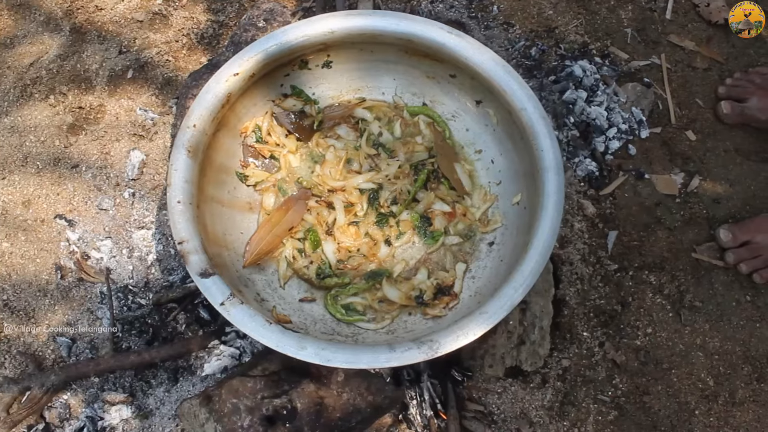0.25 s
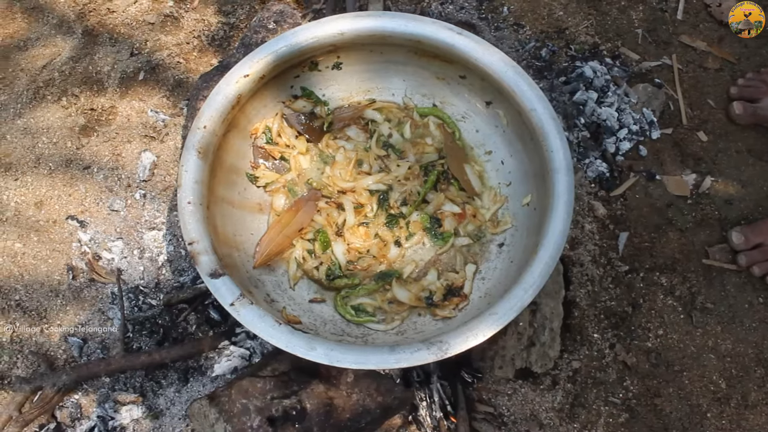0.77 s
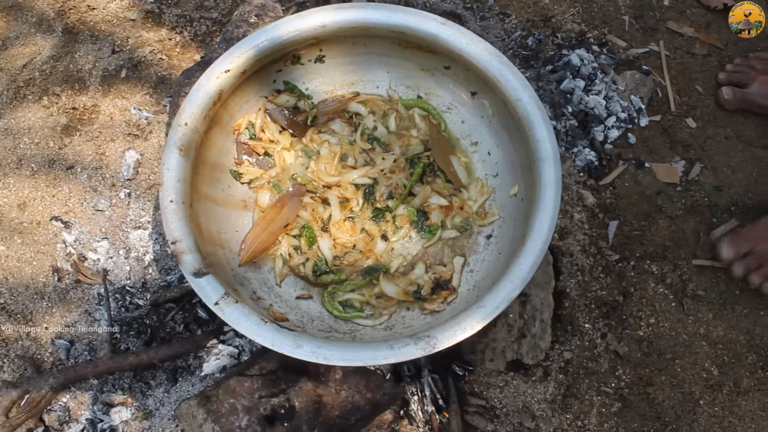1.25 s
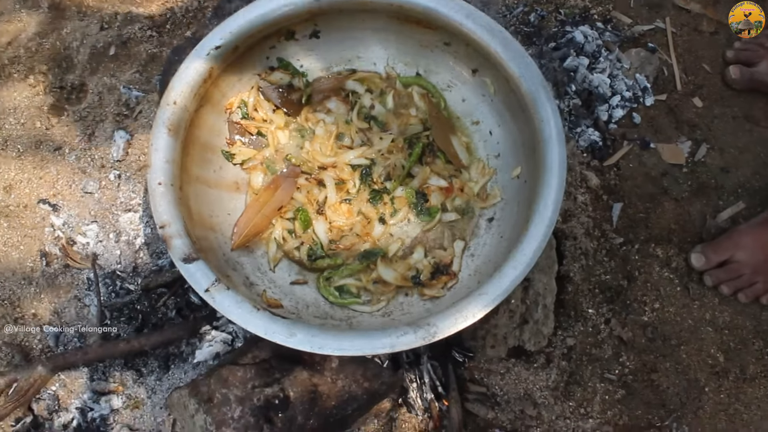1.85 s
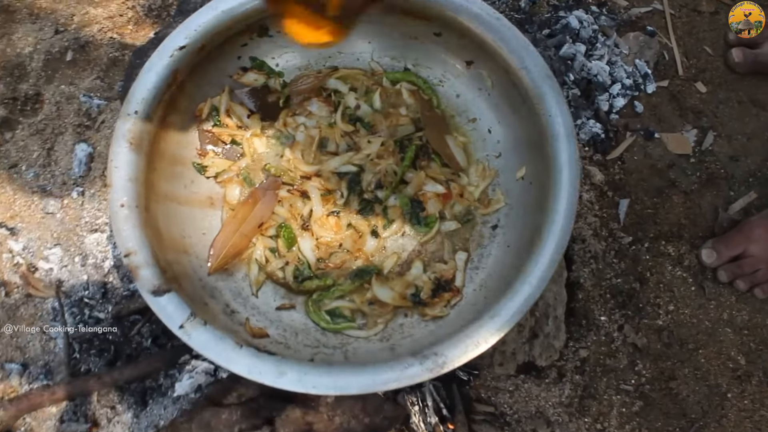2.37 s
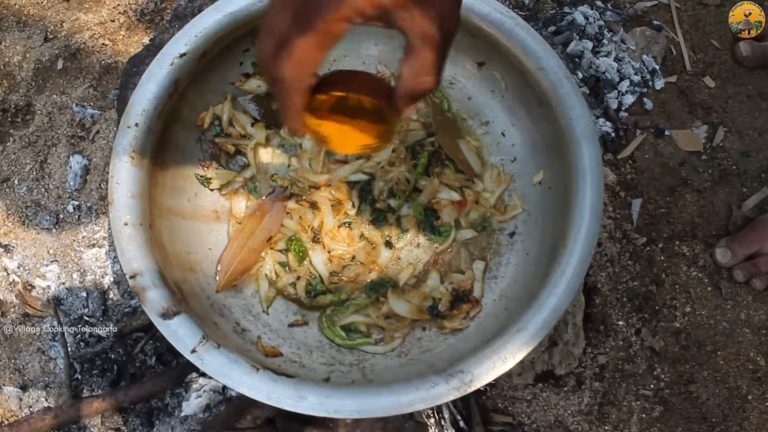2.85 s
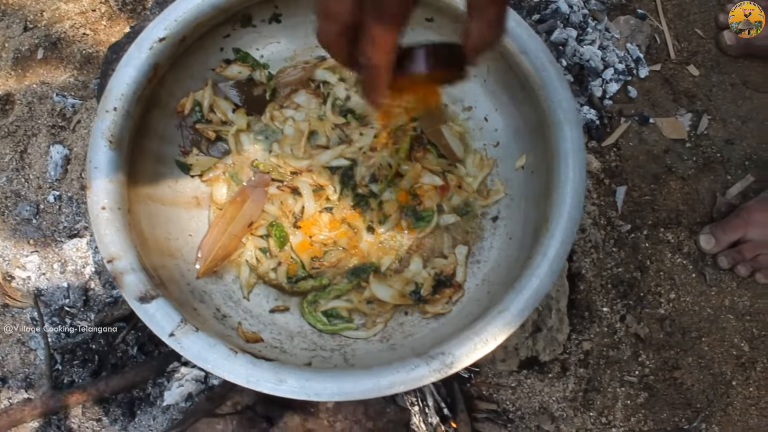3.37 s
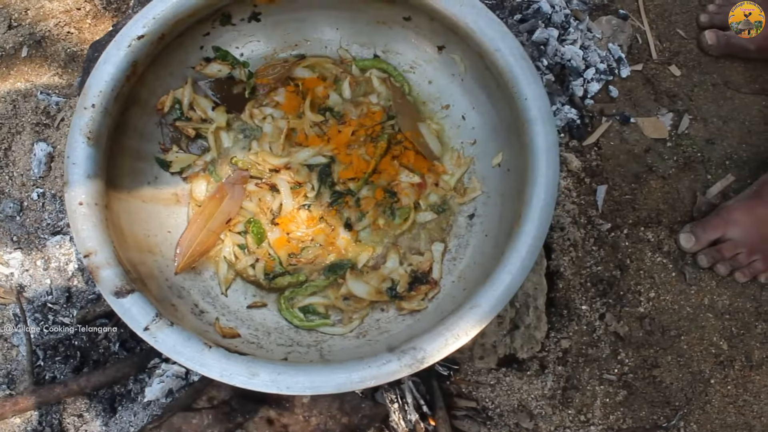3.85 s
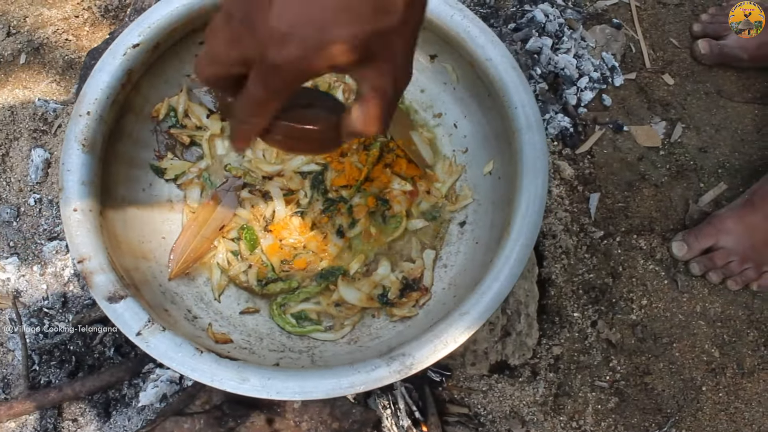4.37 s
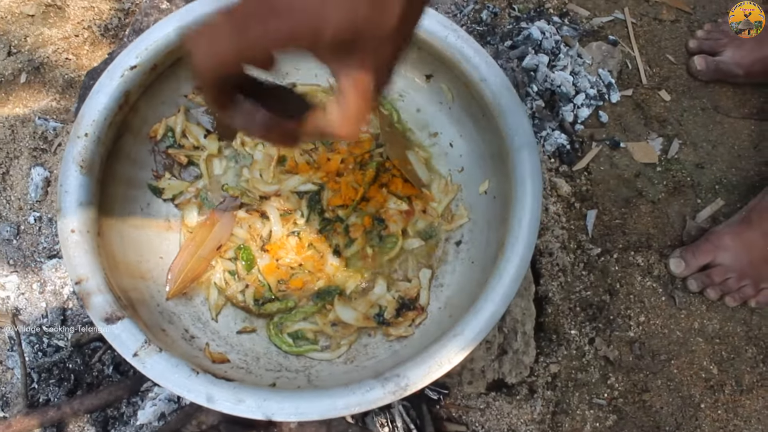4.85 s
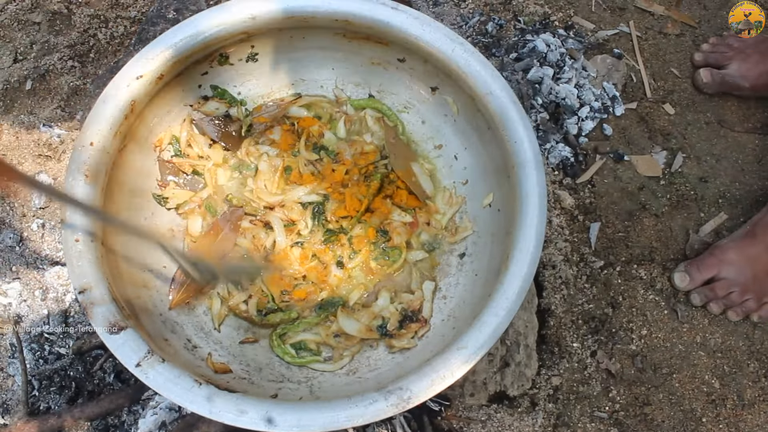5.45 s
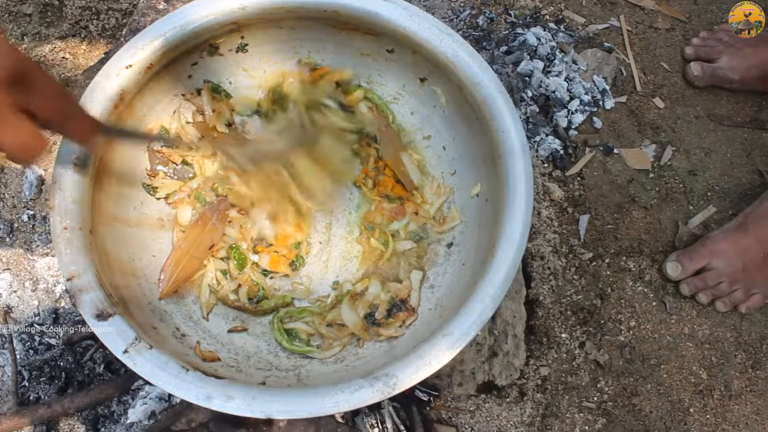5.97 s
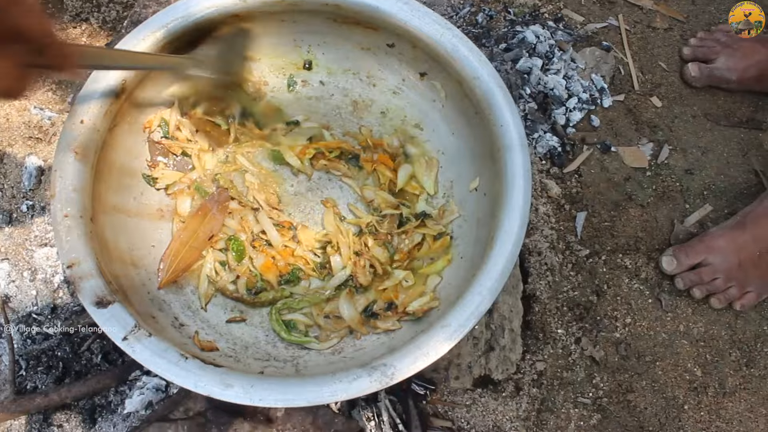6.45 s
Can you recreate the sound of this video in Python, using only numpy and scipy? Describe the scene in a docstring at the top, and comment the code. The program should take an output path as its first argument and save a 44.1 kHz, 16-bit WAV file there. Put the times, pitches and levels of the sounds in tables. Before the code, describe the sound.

Onions frying with a dense crackling hiss and snapping water drops, broken by a ringing ladle knock, soft pot thumps and brief faint scrapes.

```python
"""Onions fry in a wide metal pot outdoors. From the start, clumped bubble resonances over noise make the sizzle,
filtered noise makes the pot's murmur and light wind, and struck resonators make spitting pops of water drops.
Then come dull thumps of the pot bottom (driven resonance), ladle knocks and ladle scrapes (modal ringing).
A limiter ducks everything at each loud peak and lets it swell back.
The same passage is played again from its start after one round."""
import sys
import numpy as np
from scipy import signal
from scipy.fft import rfft, irfft, next_fast_len
from scipy.io import wavfile
from scipy.ndimage import uniform_filter1d, minimum_filter1d

SR = 44100
rng = np.random.default_rng(int(sys.argv[2]) if len(sys.argv) > 2 else 0)


def dump_mix(stems):
    """Bounce the given channels to the path in sys.argv[1] as a 16-bit WAV at rate SR."""
    frames = np.atleast_2d(stems).T  # one column per channel
    limited = np.clip(frames, -1, 1)  # hard clip at full scale
    pcm = np.round(limited * 32767).astype(np.int16)
    wavfile.write(sys.argv[1], SR, pcm)


N = 295470
ROUND_S = 4.48
ROUND_N = round(ROUND_S * SR)   # samples in one round

# modal frequencies of pot and ladle: one column (frequency [Hz])
MODE_HZ = [335, 432, 560, 1000, 1290, 1627, 2060, 2230, 2678, 3110, 3511, 4600, 4949, 6400, 8200, 10300]
# decay and excitation of each mode, in the same order:
# (t60 [s], level at contact place 0 [dB], at place 1 [dB], at place 2 [dB], at place 3 [dB])
MODE_RESPONSE = [(0.115, -26, -16.5, -14, -22), (0.051, -8, -11, -33, -24), (0.032, -6, 12.5, 0.5, -1),
                 (0.13, -29.5, -7, -12, -35), (0.057, -50, 5.5, -9, -14), (0.27, -17, -26, -24, -10),
                 (0.07, -14.5, -24, -24, -9), (0.071, -55, 1, -28, -1), (0.13, -7.5, 0, -31, 2),
                 (0.075, -36.5, -25, 3.5, 0), (0.085, 0.5, -22, -28, 2), (0.015, 0, -10, 4, -20),
                 (0.096, -16, -5, -15, -3), (0.038, -6, -1, 1, -24), (0.0055, -6, 7, 8, -23),
                 (0.036, -28.5, 3, -23, -24)]


def from_db(db):
    """Level to amplitude: 20 dB is a factor of ten."""
    return 10 ** (np.asarray(db) / 20)


def rms_one(x):
    """Normalisation to unit root-mean-square amplitude."""
    return x / np.sqrt(np.mean(x ** 2) + 1e-20)


def filtered(x, order, hz, kind):
    """Butterworth filtering: a maximally flat pass band."""
    return signal.sosfilt(signal.butter(order, hz, kind, fs=SR, output="sos"), x)


def in_time(rows):
    """Linear interpolation of each column over one round."""
    s, *columns = np.transpose(rows)
    return [np.interp(np.arange(ROUND_N) / SR, s, column) for column in columns]


def shaped(x, spectrum):
    """Minimum-phase colouring by (frequency [Hz], gain [dB]) points keeps clicks sharp; rms 1."""
    size = next_fast_len(len(x))
    hz, db = np.transpose(spectrum)
    grid = np.maximum(np.arange(size // 2 + 1) * SR / size, 1)
    log_gain = np.interp(np.log(grid), np.log(hz), db) * np.log(10) / 20
    # folding the cepstrum onto positive times gives minimum phase
    cepstrum = irfft(log_gain, size)
    cepstrum[1:size // 2] *= 2
    cepstrum[size // 2 + 1:] = 0
    response = np.exp(rfft(cepstrum))
    return rms_one(irfft(rfft(x, size) * response, size)[:len(x)])


def drift(rate_hz):
    """Slow random fluctuation of rms 1: white noise through a two-pole low-pass."""
    r = np.exp(-2 * np.pi * rate_hz / SR)
    noise = rng.standard_normal(ROUND_N + SR)
    # the first second is left out so that the filter has settled
    return rms_one(signal.lfilter([1], [1, -2 * r, r * r], noise)[SR:])


def ring(clicks, hz, t60):
    """Damped resonance: a unit click sets a decaying sine of initial height 1 ringing."""
    r = from_db(-60 / (t60 * SR))
    w = 2 * np.pi * min(hz, 18000) / SR
    return signal.lfilter([0, np.sin(w)], [1, -2 * r * np.cos(w), r * r], clicks + 1e-18)


def struck(force, place, ring_share=1):
    """Modal superposition: every mode rings as strongly as this contact place excites it."""
    return sum(from_db(levels[place]) * ring(force, hz, ring_share * t60)
               for hz, (t60, *levels) in zip(MODE_HZ, MODE_RESPONSE))


def add(out, s, sound):
    """Linear superposition of a sound that starts at s seconds."""
    at = round(s * SR)
    out[at:at + len(sound)] += sound[:max(len(out) - at, 0)]


def echoed(x):
    """Early reflection: direct sound plus delayed, weaker copies."""
    # reflections from pot wall and ground: (delay [s], level [dB])
    reflections = [(.0013, -30), (.0035, -23)]
    out = x.copy()
    for delay_s, db in reflections:
        add(out, delay_s, from_db(db) * x)
    return out


def sizzle(per_s, spread_db, cycles, clump_db, hiss_db):
    """Bubble resonance: steam bubbles burst in clumps, each swelling and fading, above a hiss of smaller ones."""
    # colour of the frying: (frequency [Hz], gain [dB])
    frying_colour = [(530, -49), (900, -23), (1120, -29), (1370, -13.5), (1820, -5), (2450, -6),
                     (3180, 1.5), (3710, 1), (5980, -1), (7770, 1.5), (15500, -7.5)]
    sizes = from_db(spread_db * np.minimum(rng.exponential(1, ROUND_N), 5.))
    bursts = sizes * rng.choice([-1, 1], ROUND_N)
    born = rng.random(ROUND_N) < per_s * from_db(clump_db * drift(25.)) / SR
    dealt = rng.integers(0, 16, ROUND_N)   # which pitch each bubble gets
    grains = 0
    for k, hz in enumerate(np.geomspace(900, 14000, 16)):
        once = ring(bursts * born * (dealt == k), hz, cycles / hz)
        twice = ring(once, hz, cycles / hz)   # a second resonance makes the grain swell before it fades
        grains = grains + rms_one(twice) * np.sqrt(hz)
    hiss = rng.standard_normal(ROUND_N) * from_db(1.4 * drift(1.54))
    hiss = rms_one(signal.lfilter([1, -.35], [1], hiss))   # the smallest bubbles are the brightest
    return shaped(rms_one(grains) + from_db(hiss_db) * hiss, frying_colour)


def murmur(sizzle_db):
    """Filtered noise: the pot's murmur follows part of the sizzle's swing in level."""
    # colour of the murmur: (frequency [Hz], gain [dB])
    murmur_colour = [(120, -31.5), (200, -21), (300, -12), (369, 3), (441, 3.5), (494, 5.5), (615, -2),
                     (741, -3), (849, -8), (1110, 2.5), (2400, -6.5), (3120, -29), (5280, -120)]
    mean_db, follow_share = -62.5, 0.58   # level at mean vigour; share of the sizzle's swing
    level_db = mean_db + follow_share * (sizzle_db - sizzle_db.mean())
    noise = shaped(rng.standard_normal(ROUND_N), murmur_colour)
    return from_db(level_db + 2.0 * drift(10.0)) * noise


def wind(wind_db):
    """Turbulence as low-pass-coloured noise of slowly fluctuating level."""
    # colour of the wind: (frequency [Hz], gain [dB])
    wind_colour = [(12, -17), (20, -17), (43, -16.5), (300, -22.5), (390, -30), (660, -120)]
    noise = shaped(rng.standard_normal(ROUND_N), wind_colour)
    return from_db(wind_db + 2.4 * drift(2.4)) * noise


def pops(rows):
    """Impulse response: each burst is a pitched ragged crack, a bright snap and a low body from the pot."""
    out, t = np.zeros(ROUND_N), (np.arange(900) - 60) / SR
    noise = rng.standard_normal((len(rows), 2, 900))
    for (s, hz, peak_db, body_db, snap_db), (ragged, spray) in zip(rows, noise):
        click = (t == 0) + .13 * ragged * np.exp(-np.abs(t) / .0004)
        # the oil settles for a few ms
        splash = click + 0.34 * spray * np.exp(-t / 0.0032) * (t > 0)
        body = filtered(splash, 1, [500, 1900], "band") + 0.024 * ring(click, 516, 0.047)
        crack = filtered(np.gradient(ring(click, hz, 3.2 / hz)), 1, 8000, "low")
        snap_force = np.sign(spray) * (t == 0) + 1.05 * spray * np.exp(-np.abs(t) / 0.00034)
        snap = filtered(snap_force, 2, 7000, "high")
        parts = zip((crack, body, snap), (0, body_db, snap_db))
        burst = sum(from_db(db) * part / np.abs(part).max() for part, db in parts)
        add(out, max(s + t[0], 0), from_db(peak_db) * burst / np.abs(burst).max())
    # so small a source radiates no bass
    return filtered(echoed(out), 3, 330, "high")


def spits():
    """Random arrivals: rows of smaller drops with uniformly spread times, pitches and levels."""
    per_s, (low_hz, high_hz) = 30, (3730, 6000)
    loudest_db, range_db = -32.5, 11   # the peaks spread over this range below the loudest
    body_db, snap_db, vary_db = -24, 0.5, 10.5   # beside the crack; either way by vary_db
    u = rng.random((round(per_s * ROUND_S), 5))
    return np.c_[u[:, 0] * ROUND_S,
                 low_hz + (high_hz - low_hz) * u[:, 1],
                 loudest_db - range_db * u[:, 2],
                 body_db + vary_db * (2 * u[:, 3] - 1),
                 snap_db + vary_db * (2 * u[:, 4] - 1)]


def thumps():
    """Driven resonance: a padded blow pushes the food-damped bottom for a few cycles, then it dies quickly."""
    # soft blows on the pot bottom: (time [s], peak level [dB], pitch [Hz], push length [s])
    soft_blows = [(1.018, -32.5, 430, 0.0052), (1.056, -38, 420, 0.011), (1.258, -51, 400, 0.0095),
                  (1.575, -31, 333, 0.0035), (2.385, -34, 405, 0.0065), (3.117, -40.5, 434, 0.0063),
                  (3.144, -45, 432, 0.018), (4.284, -36.5, 346, 0.006), (4.387, -44.5, 540, .005)]
    out, t = np.zeros(ROUND_N), np.arange(3000) / SR
    for s, peak_db, hz, push_s in soft_blows:
        push = np.sin(2 * np.pi * hz * t) * (t < push_s)
        sound = ring(push, hz, 0.018)
        add(out, s, from_db(peak_db) * sound / np.abs(sound).max())
    return out


def knocks():
    """Modal impact: each mode is caught at its own instant of the contact, which clatters for a few ms."""
    # ladle on pot: (time [s], ring level [dB], clatter level [dB], contact place [0-3])
    ladle_blows = [(1.8464, -14.5, -9.5, 0), (3.958, -48, -42, 2), (3.972, -52, -48, 2),
                   (4.284, -37.5, -33.5, 3)]
    # the modes are caught within contact_s, while the clatter holds; then it fades
    contact_s, fade_s = 0.001195, 0.0048
    out, clatter, t = np.zeros(ROUND_N), np.zeros(ROUND_N), np.arange(SR // 2) / SR
    lags = rng.random((len(ladle_blows), len(MODE_RESPONSE)))
    noises = rng.choice([-1., 1.], (len(ladle_blows), len(t)))
    for (s, ring_db, clatter_db, place), lag, noise in zip(ladle_blows, lags, noises):
        for hz, (t60, *levels), late in zip(MODE_HZ, MODE_RESPONSE, lag):
            mode = ring(1. * (t == 0), hz, t60)
            add(out, s + contact_s * late, from_db(ring_db + levels[round(place)]) * mode)
        fade = np.exp(-np.maximum(t - contact_s, 0) / fade_s)
        add(clatter, s, from_db(clatter_db) * noise * fade)
    return out + filtered(clatter, 1, [1500, 9000], "band")


def scrapes():
    """Friction as dense uneven impulses: catches under each stroke excite the modes and rasp directly."""
    # ladle dragged over the bottom, at contact places 1, 2 and 3 in turn: (start [s], end [s],
    # ring level at start [dB], at middle [dB], at end [dB], rasp beside the ring [dB])
    strokes = [(3.118, 3.164, -41, -47, -55, -2), (3.951, 4.074, -50, -51, -53.5, 1.5),
               (4.283, 4.351, -50, -36, -37.5, 0)]
    # band of each rasp: (low edge [Hz], high edge [Hz])
    rasp_bands = [(1000, 12000), (1210, 15000), (910, 12000)]
    pressed = .55   # share of the ring time left while the ladle presses on the pot
    t, out = np.arange(ROUND_N) / SR, 0
    caught = rng.random(ROUND_N) < 1500 / SR   # 1500 catches per second on average
    catches = rms_one(caught * rng.standard_normal(ROUND_N) * from_db(3.9 * drift(64.0)))
    for place, (row, band_hz) in enumerate(zip(strokes, rasp_bands), 1):
        start, end, *press_db, rasp_db = row
        edges = np.clip((t - start) / 0.002, 0, 1) * np.clip((end - t) / 0.011, 0, 1)
        press = from_db(np.interp(t, [start, (start + end) / 2, end], press_db))
        stroke = edges * press * catches
        # dividing by the response to steady catches sets ring and rasp to their levels
        ringing = struck(stroke, place, pressed) / np.std(struck(catches, place, pressed))
        rasp = filtered(stroke, 1, band_hz, "band") / np.std(filtered(catches, 1, band_hz, "band"))
        out = out + ringing + from_db(rasp_db) * rasp
    return out


def limited(x):
    """Peak limiting: gain drops just ahead of each peak over the ceiling, then climbs back at a steady dB rate."""
    ceiling_db, release_db_per_s, look_ahead_s = -19.5, 18.5, .0015
    climb_db = release_db_per_s * np.arange(len(x)) / SR
    ahead = round(look_ahead_s * SR)
    room_db = np.minimum(ceiling_db - 20 * np.log10(np.abs(x) + 1e-9), 0)
    room_db[0] = -7   # it starts already turned down
    gain_db = np.minimum(np.minimum.accumulate(room_db - climb_db) + climb_db, 0)
    early_db = minimum_filter1d(gain_db, 2 * ahead + 1)
    return x * from_db(uniform_filter1d(early_db, ahead))


def scene():
    """Superposition of all sources over one round, which then repeats."""
    # how hard the oil fries and the wind blows, before the limiter: (time [s], sizzle level [dB], wind level [dB])
    vigour = [(0, -43.5, -68), (.3, -46.5, -68.5), (.45, -45, -75), (.62, -42.5, -66), (.8, -47, -72),
              (1.1, -45, -73), (1.3, -45.5, -70.5), (1.55, -44, -70), (1.8, -45.5, -76),
              (2.0, -42.5, -68.5), (2.4, -45, -73.5), (2.7, -46, -68), (2.9, -44.5, -69),
              (3.05, -49.5, -76), (3.35, -47.5, -65.5), (3.55, -49, -73.5), (3.72, -44.5, -69.5),
              (3.9, -49, -75), (4.2, -45, -69), (4.48, -46.5, -71)]
    # loud water drops bursting in the oil, before the limiter: (time [s], pitch [Hz], peak level [dB],
    # low body beside the crack [dB], bright snap beside the crack [dB])
    loud_drops = [(0.0383, 1900, -26.5, 11, -5), (0.0434, 4530, -24, -12, 2),
                  (0.1604, 4830, -14.5, -23, -6), (0.2402, 4750, -21.5, -10, -8),
                  (0.3748, 4330, -31, -21, -7), (0.4022, 3560, -13, -6.5, -6), (0.6418, 4410, -25, -22, 1),
                  (0.6669, 4000, -31, -10, -18), (0.6742, 4930, -27, -16, 9),
                  (0.692, 4140, -11.5, -11.5, -11), (0.7183, 3870, -17.5, -9, -13),
                  (0.7722, 4600, -10, -22, -4), (0.7947, 4920, -23, -10, -9), (0.8466, 1900, -20, -1, -11),
                  (0.9025, 3400, -16, -25, -10), (0.9657, 3870, -26.5, -4, 0), (1.0023, 4910, -23, -18, 10),
                  (1.222, 4760, -18.5, -16, -1), (1.3044, 4270, -31, -16, 12), (1.3296, 5660, -29, -25, -4),
                  (1.3477, 5460, -31, -19, 0), (1.3756, 3370, -11.5, -18.5, -5),
                  (1.4059, 4770, -6.5, -27, 7), (1.4129, 5910, -27, -27, -4), (1.4205, 5270, -19, -28, 3),
                  (1.4383, 5110, -14, -22, 17), (1.4698, 3280, -17, -21, -17),
                  (1.4843, 5160, -22, -29, -13), (1.5493, 4890, -16.5, -22, -11),
                  (1.5953, 4640, -19.5, -21, -5), (1.6278, 5030, -19, -16.5, -7),
                  (1.6326, 3980, -19, -17, -15), (1.6576, 4290, -27, -16, 5), (1.7536, 4150, -17.5, -19, 5),
                  (1.8075, 4730, -18, -22, 9), (1.8282, 5170, -21, -26, 7), (1.9008, 4590, -18.5, -13, 2),
                  (1.9163, 4410, -25, -19, 0), (2.1153, 5350, -22, -25, 1), (2.1369, 3070, -8.5, -8, -19),
                  (2.1467, 4850, -29, -20, 1), (2.1762, 4810, -30, -18, 4), (2.1874, 3850, -20.5, -8, -16),
                  (2.2632, 4480, -22, -16, -3), (2.2934, 4820, -18.5, -23, -2), (2.3348, 5040, -19, -21, 7),
                  (2.4232, 4900, -23.5, -18, -2), (2.4556, 4310, -23, -15, 7), (2.541, 3620, -23, -14, 13),
                  (2.5767, 4740, -23, -28, -15), (2.6261, 5310, -26.5, -32, -11),
                  (2.6658, 5360, -37, -19, -3), (2.6842, 5380, -29, -10, -4),
                  (2.7014, 4350, -14.5, -11.5, -23), (2.7062, 3730, -23, -8, 0),
                  (2.8031, 5030, -27, -24, 0), (2.8274, 5860, -23.5, -27, 6), (2.8469, 5370, -22, -19, 5.5),
                  (2.8576, 4650, -24.5, -16.5, 0), (2.88, 5100, -28, -25, -2), (2.9105, 4610, -30, -14, 1),
                  (2.9593, 4030, -15, -25, -3), (2.9998, 4800, -26.5, -21, -2), (3.1934, 4340, -26, -7, -9),
                  (3.3488, 4200, -16.5, -11, 14.5), (3.3926, 4940, -25, -16, 12),
                  (3.5017, 5530, -26, -14, 4), (3.5072, 4500, -25, -15, -2), (3.6957, 5140, -26, -19, 0),
                  (3.7412, 4440, -27, -21, -6), (3.7754, 5110, -31, -14, 6), (3.8399, 5200, -41, -18, 11),
                  (3.9382, 3770, -28.5, -13, -12), (4.0606, 5460, -14, -13, 5.5),
                  (4.0652, 5090, -15.5, -18, 6), (4.1347, 4470, -24, -15, 8), (4.1412, 5100, -12, -34, 5),
                  (4.1547, 4500, -22, -15, 4), (4.2051, 3110, -30.5, -4, -3), (4.2596, 3860, -22, -20, -15),
                  (4.4286, 4300, -12.5, -17.5, -7)]
    sizzle_db, wind_db = in_time(vigour)
    fry = from_db(sizzle_db) * sizzle(per_s=2500., spread_db=3.5, cycles=4.45, clump_db=4.5, hiss_db=0.5)
    background = murmur(sizzle_db) + wind(wind_db)
    drops = pops(loud_drops) + pops(spits())
    # thin metal radiates little below its lowest mode
    metal = filtered(thumps() + knocks() + scrapes(), 2, 220, "high")
    return np.resize(fry + background + drops + metal, N)[None]


def record(dry):
    """Band limiting: the deepest bass rolls off, one round is limited and repeats, the top is cut steeply."""
    one_round = filtered(dry[0, :ROUND_N], 2, 40, "high")
    held = np.resize(limited(one_round), N)[None]
    return signal.sosfilt(signal.ellip(12, .5, 75, 15800, fs=SR, output="sos"), held)


dry = scene()
out = record(dry)
dump_mix(out)
```